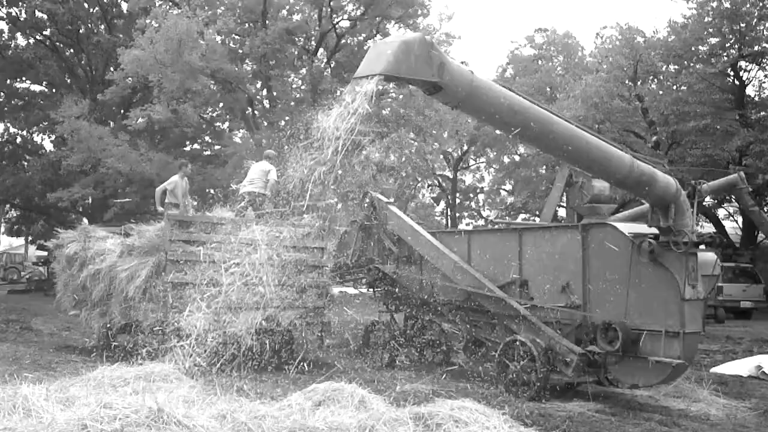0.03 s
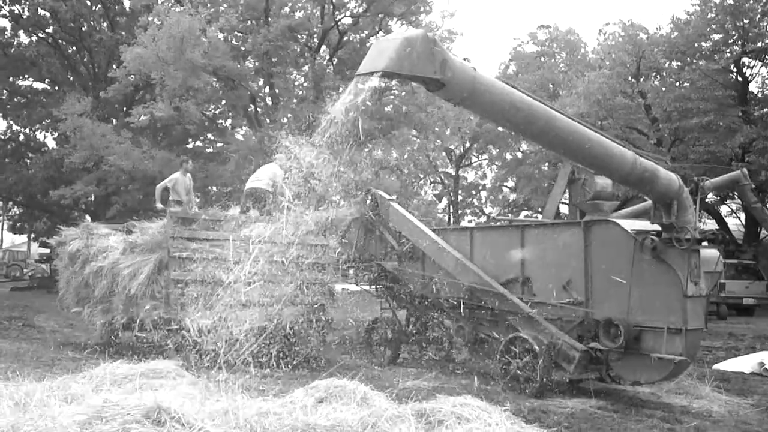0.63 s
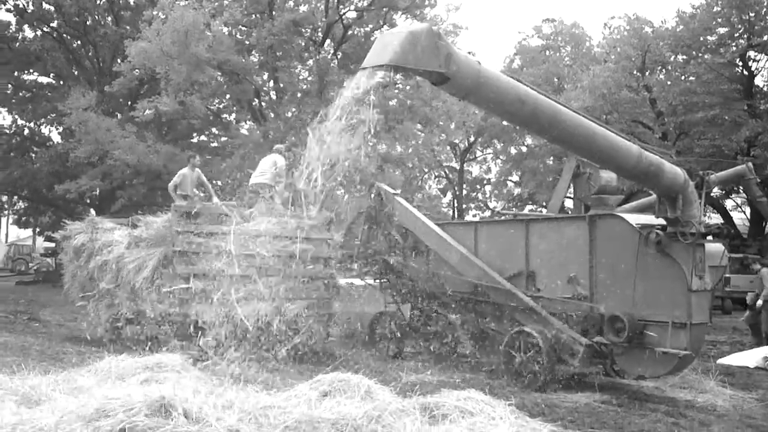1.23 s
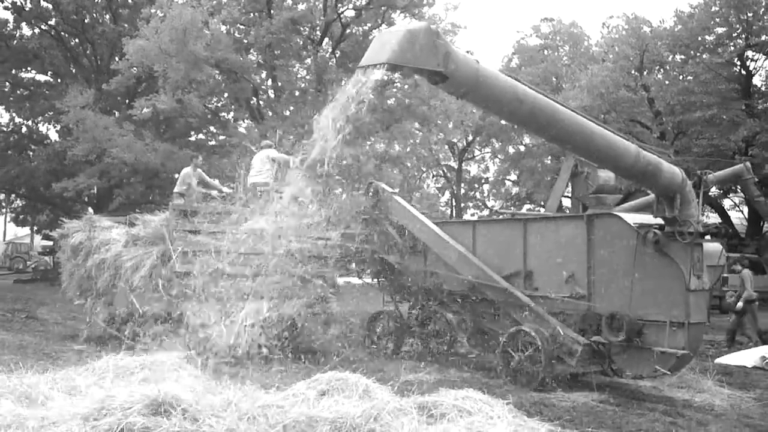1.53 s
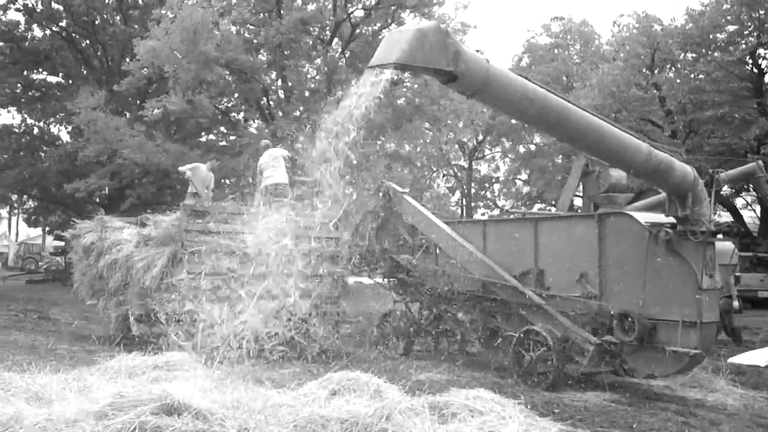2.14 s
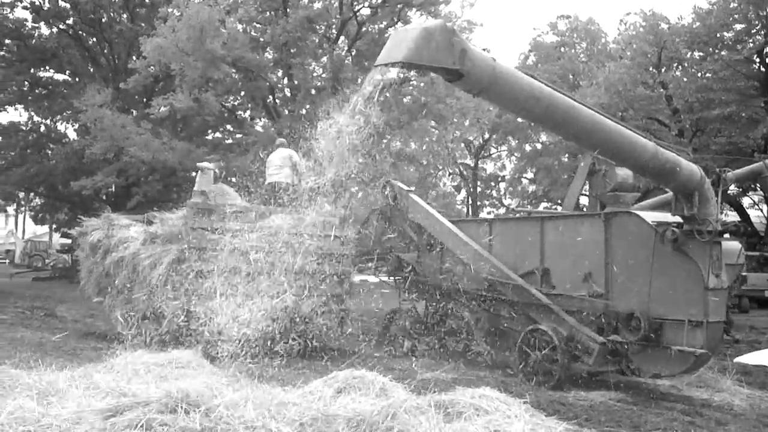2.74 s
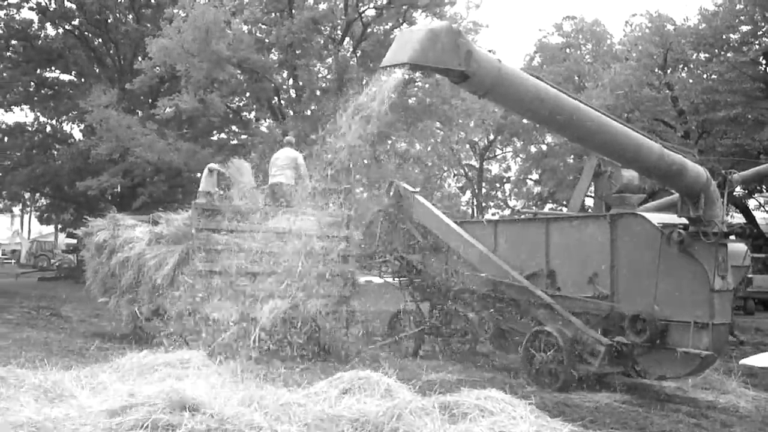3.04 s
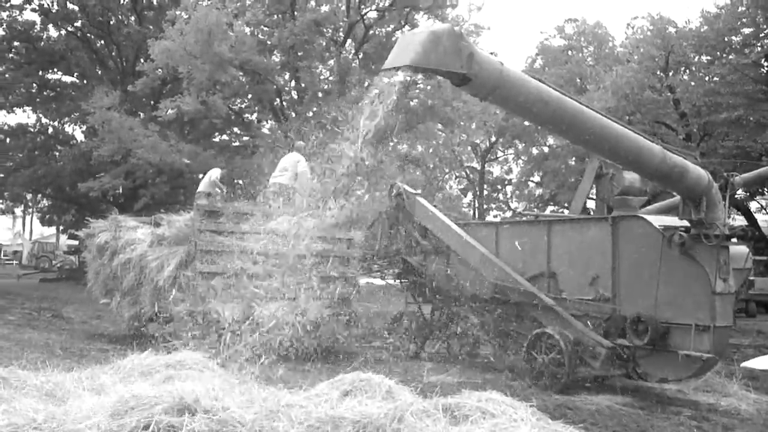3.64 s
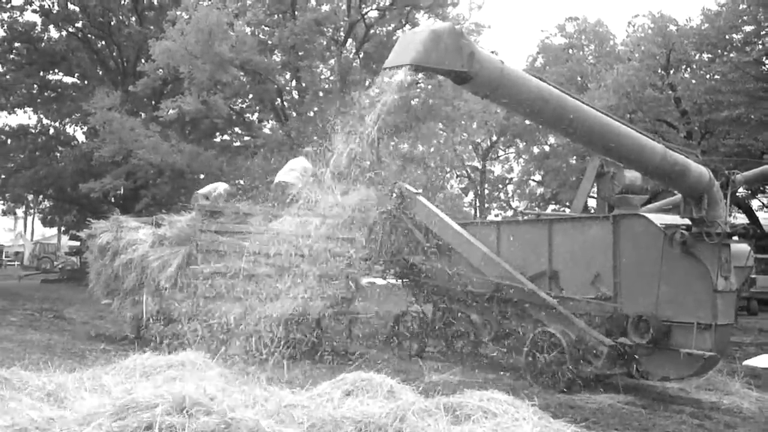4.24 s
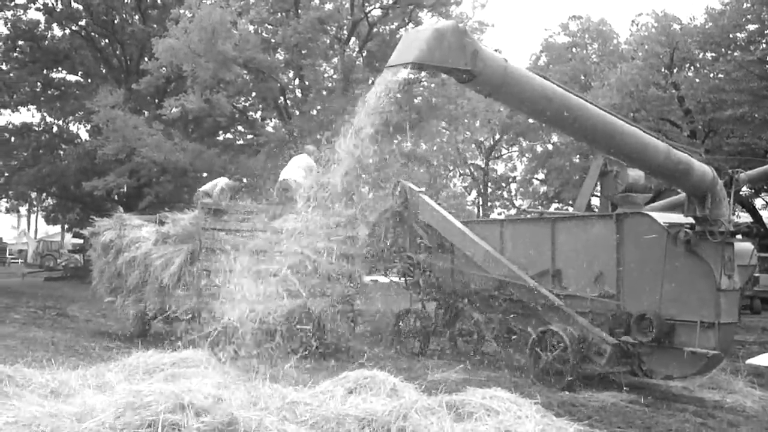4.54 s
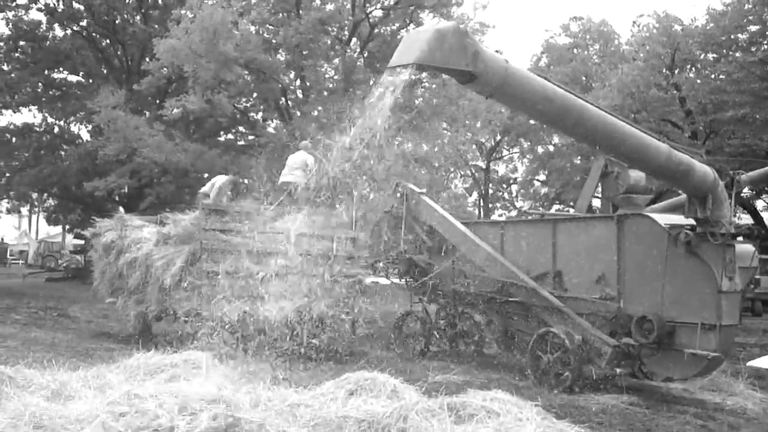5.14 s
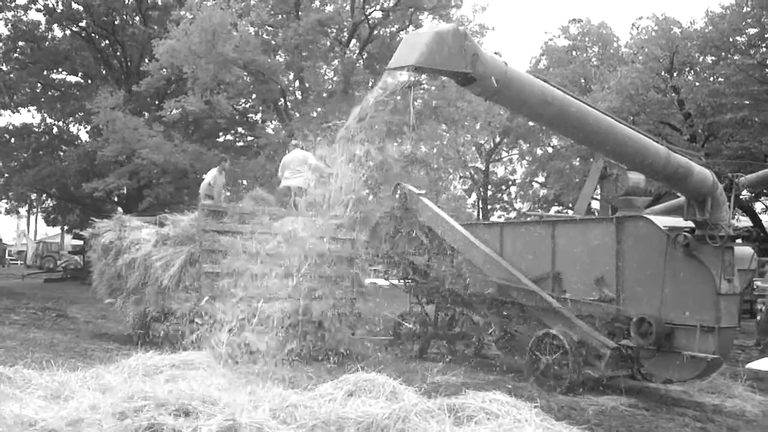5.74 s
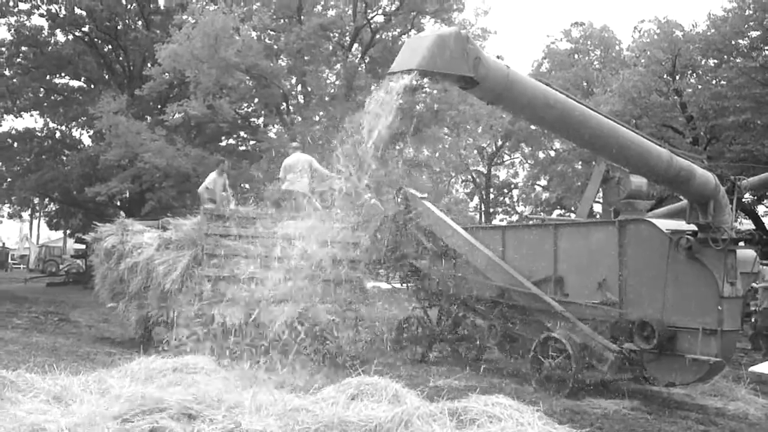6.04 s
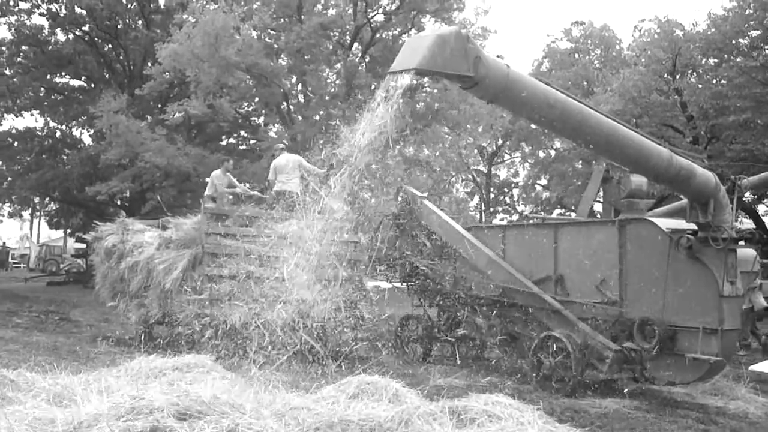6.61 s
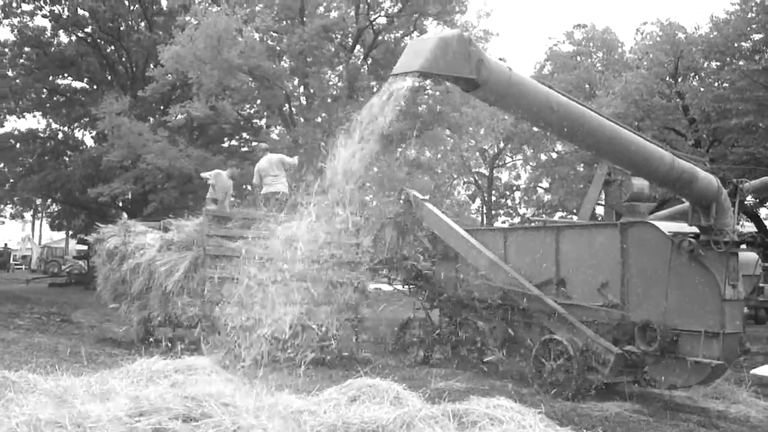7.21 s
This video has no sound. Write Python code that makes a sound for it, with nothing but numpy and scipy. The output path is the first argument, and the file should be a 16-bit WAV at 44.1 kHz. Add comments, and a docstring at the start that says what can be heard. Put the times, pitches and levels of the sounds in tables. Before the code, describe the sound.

Steady rumble and roar of a thresher blowing out straw, with hiss, rattles and a motor droning past late on.

```python
"""A threshing machine's roar and hiss fade in from silence. Drum bars beat sheaves in a ringing
sheet-metal housing; the blower drives air and straw up its pipe; the works knock over a low rumble.
Behind it puffs the slow two-cylinder tractor that drives it. Late on, another motor drones past,
falling in pitch. Heard through a close microphone pair and a stereo widener."""
import sys
import numpy as np
from scipy import signal
from scipy.fft import rfft, irfft, next_fast_len
from scipy.io import wavfile

SR = 44100
rng = np.random.default_rng(int(sys.argv[2]) if len(sys.argv) > 2 else 0)


def inscribe(sig):
    """Save sig as 16-bit PCM at rate SR to the path in sys.argv[1].

    A 1-D sig is mono; a 2-D sig holds one channel per row.
    Samples are clipped to [-1, 1] before scaling.
    """
    pcm = np.round(np.clip(np.atleast_2d(sig).T, -1, 1) * 32767)
    wavfile.write(sys.argv[1], SR, pcm.astype(np.int16))


N = 325017
TIME_S = np.arange(N) / SR
FFT_SIZE = next_fast_len(N + 8192)
BINS_HZ = np.maximum(np.arange(FFT_SIZE // 2 + 1) * SR / FFT_SIZE, 1)

# Table levels are relative; the sources add their own gains.
# Level curves: t/s, level/dB
MOTOR_HUM = [(3.8, -45), (4.5, -32.5), (5.0, -26.5), (5.4, -23.5), (5.66, -28), (5.88, -48), (6.3, -37),
             (6.8, -32), (7.37, -32)]   # passing motor, 3rd harmonic
TRACTOR_LOAD = [(0.9, -28), (1.3, -28), (1.7, -40), (2.4, -34), (3.7, -24), (4.1, -26), (4.7, -24),
                (5.6, -27), (7.37, -25)]   # puff strength
RUMBLE_LEVEL = [(1.0, -33), (2.0, -31.5), (2.7, -30.5), (3.3, -31), (4.0, -30.5), (5.0, -33), (6.0, -32),
                (7.37, -30)]
# Thresher workload: t/s, drum/dB, blower/dB, straw/dB
WORKLOAD = [(1, -31.5, -30, -32), (1.3, -25, -28.5, -29.5), (1.7, -28, -28, -30),
            (2.2, -25.5, -27.5, -28.5), (2.5, -29, -29, -30), (2.8, -27, -26.5, -29.5),
            (3.25, -25.5, -27.5, -28.5), (3.8, -27, -27.5, -29.5), (4.3, -27.5, -26.5, -29),
            (5, -27.5, -26.0, -30), (5.4, -26.5, -26.0, -29.5), (5.9, -27.5, -24.5, -29),
            (6.3, -27.5, -26, -29), (7.37, -28.5, -26.0, -29)]
# Passing motor, one row per multiple: level/dB, decay after the loudest moment/(dB/s)
MOTOR_HARMONICS = [(-31, 16), (-35, 1.5), (-37, 2.3), (-47, 4.9)]
MOTOR_MULTIPLES = (2, 4, 5, 6)
# Blade harmonics favoured by the blower casing: multiple, level/dB
BLADE_HARMONICS = [(9, -47), (10, -41.5), (11, -46), (13, -50)]
# Blows: t/s, peak/dB
HARD_FIRINGS = [(2.335, -30), (2.668, -33), (3.7, -24), (3.98, -39), (4.398, -26), (5.0, -36), (5.672, -32)]
WAD_HITS = [(1.052, -21), (1.209, -17), (1.279, -21), (1.553, -16), (1.585, -18), (1.759, -17.5),
            (1.86, -19), (2.032, -18.5), (2.17, -27), (2.251, -22), (2.279, -20), (2.695, -20),
            (2.818, -17), (3.022, -19), (3.176, -18), (3.575, -32), (3.666, -22), (4.013, -19), (4.27, -21),
            (4.622, -18), (4.694, -22), (4.753, -19), (5.486, -18), (5.783, -16.5), (6.02, -18.5),
            (6.093, -22), (6.171, -17), (6.493, -20), (6.736, -18.5), (6.785, -20), (6.832, -16),
            (7.2, -18), (7.297, -15.5)]   # straw on the hood
SHEAF_HITS = [(1.24, -15.5), (1.322, -17), (1.63, -17), (2.793, -14), (3.028, -15), (3.248, -22),
              (3.473, -17), (3.69, -16), (3.845, -18.5), (4.11, -21), (4.245, -16.5), (4.41, -17.5),
              (4.63, -27), (4.855, -17.5), (5.03, -20.5), (5.255, -21), (5.342, -11.5), (5.52, -19),
              (5.968, -14.5), (6.56, -24), (7.1, -19)]   # sheaves on the drum
# Knocks in the works: t/s, thud peak/dB, pipe ring peak/dB
KNOCKS = [(1.208, -27, -33), (1.282, -18.5, -45), (1.323, -27, -37), (1.758, -25, -32), (3.154, -28, -33),
          (3.241, -28, -28.5), (3.318, -32, -35), (3.475, -26, -33.5), (4.653, -26, -32.5),
          (4.844, -28, -38), (5.512, -24, -41), (5.535, -23, -40)]
# Peaks of the rough low hum: f/Hz, width/Hz, level/dB
LOW_HUM_PEAKS = [(99.4, 13, -5.5), (146, 50, -2), (197.4, 33, -3.5), (239.6, 27, -3), (285, 18, -6)]
# Resonances: f/Hz, width/Hz, level/dB
EXHAUST_MODES = [(111, 35, -1), (138, 56, -3.5)]
PIPE_MODES = [(843, 95, 1.5), (1013, 137, -3.5), (1087, 132, -4.5), (1422, 64, -6)]
HOUSING_MODES = [(409, 48, -6), (514.4, 55, -3), (576, 70, -5.5), (682, 81, -13.5)]
# Noise spectra: f/Hz, density/dB
RUMBLE_SPECTRUM = [(20, -15), (40, -12), (65, -13), (85, -5), (110, -2.5), (170, -0.5), (260, -2),
                   (340, -3.5), (600, -8.5), (900, -31)]
KNOCK_SPECTRUM = [(150, -20), (500, -11), (1100, -1.5), (2000, 2), (5000, -3.5), (12000, -58)]
STRAW_SPECTRUM = [(1200, -32), (2250, 2), (2560, -1), (3050, 1.5), (3600, 2), (4150, 3.5), (4650, 1),
                  (5100, 0.5), (5500, -4.5), (5950, 2.5), (6600, -0.5), (7100, 2), (7700, 0.5),
                  (8400, -0.5), (10000, -6.5), (11000, -13.5), (12700, -7), (14000, -29), (15600, -22)]
AIR_SPECTRUM = [(400, -16.5), (680, -3), (770, -1.5), (850, -0.5), (950, 1.6), (1300, -4), (1800, -3.5),
                (2300, -7.5), (3000, -20.5), (6000, -35)]
# Field at the microphones: f/Hz, side minus mid/dB, mid-side coherence/0-1, side phase/rad
STEREO_FIELD = [(40, -10.5, .1, -1), (62, -9, .2, 3), (82.4, -0.5, 0.26, 1.5), (100, -8.5, 0.85, 2),
                (150, -10.5, 0.97, 2), (226, -13, 0.88, 2), (322, -6.5, 0.93, 1), (414, -6, 0.87, .5),
                (520, -14.5, 0.76, 0.4), (600, -13, .3, 3), (680, -3.5, .65, 3), (764, 2.5, 0.75, .5),
                (880, -7, 0.3, -.5), (1100, -5.5, .3, -1), (1400, 8, 0.5, -4), (1800, 2, 0.48, -4.5),
                (2400, -0.5, 0.24, -4.5), (3420, 1.5, .6, -7.5), (4600, 1, 0.65, -5.5),
                (6100, -1, 0.5, -6.5), (7730, -1, 0.9, -11), (8600, -2.5, 0, -4.5), (10200, 2.5, 1, -10.5),
                (12000, 2.5, 0.3, -6.5), (14000, 1.5, .15, -5)]


def from_db(db):
    """Decibels to gain."""
    return 10 ** (np.asarray(db) / 20)


def unit_rms(x):
    """Scale to rms 1."""
    return x / np.sqrt(np.mean(x ** 2) + 1e-20)


def in_time(rows):
    """Curve columns at every sample."""
    times_s, *columns = np.transpose(rows)
    return [np.interp(TIME_S, times_s, c) for c in columns]


def in_frequency(rows):
    """Spectrum columns at every bin."""
    hz, *columns = np.transpose(rows)
    return [np.interp(np.log(BINS_HZ), np.log(hz), c) for c in columns]


def colour(x, spectrum):
    """Apply a smooth spectrum; rms 1."""
    gain = from_db(in_frequency(spectrum)[0])
    return unit_rms(irfft(rfft(x, FFT_SIZE) * gain, FFT_SIZE)[..., :N])


def resonate(x, modes):
    """Parallel resonators, alternating signs; rms 1."""
    out = 0
    for k, (hz, width_hz, level_db) in enumerate(modes):
        radius = np.exp(-np.pi * width_hz / SR)
        b = np.array([1, 0, -1]) * (1 - radius ** 2) / 2
        a = [1, -2 * radius * np.cos(2 * np.pi * hz / SR), radius ** 2]
        out = out + (-1) ** k * from_db(level_db) * signal.lfilter(b, a, x)
    return unit_rms(out)


def band(x, low_hz, high_hz):
    """Band-pass; rms 1."""
    sos = signal.butter(2, [low_hz, high_hz], "band", fs=SR, output="sos")
    return unit_rms(signal.sosfilt(sos, x))


def flatten(x):
    """Flatten the envelope, keep the pitch; rms 1."""
    phase = np.angle(signal.hilbert(x, FFT_SIZE)[:, :N])
    return unit_rms(np.cos(phase))


def drift(corner_hz):
    """Slow random wander; rms 1."""
    white = rfft(rng.standard_normal(FFT_SIZE))
    slow = white / (1 + (BINS_HZ / corner_hz) ** 2) * (BINS_HZ > 1)
    return unit_rms(irfft(slow, FFT_SIZE)[:N])


def noise():
    """White noise. Rows, as in every source: direct, scattered."""
    return rng.standard_normal((2, N))


def grains(per_s, spread_db):
    """Random impacts of uneven size; rms 1."""
    sizes = from_db(spread_db * np.minimum(rng.exponential(1, N), 4))
    return unit_rms(noise() * sizes * (rng.random(N) < per_s / SR))


def bursts(rows, rise_s, decay_s):
    """Envelope of blows given as t/s, peak/dB."""
    out = np.zeros(N)
    for start_s, peak_db in rows:
        start = int(start_s * SR)
        age_s = TIME_S[:min(SR // 4, N - start)]
        shape = (1 - np.exp(-age_s / rise_s)) ** 2 * np.exp(-age_s / decay_s)
        out[start:start + len(age_s)] += from_db(peak_db) * shape / shape.max()
    return out


def passing_motor(rest_hz=47.75, speed_m_s=28.2, distance_m=28.5, abreast_s=6.08, loudest_s=5.54):
    """Doppler-shifted drone over exhaust rumble; a lengthening echo notches the weak harmonics in turn."""
    sound_m_s, waver = 343, 0.0032
    echo_abreast_s, echo_s_per_s, echo_gain = 0.00993, 0.0024, 0.72
    edge_db, approach_s, deep_swell_s = -6.5, 1.08, 0.88   # swells are at edge_db this far from the peak
    along_m = speed_m_s * (TIME_S - abreast_s)
    receding_m_s = speed_m_s * along_m / np.hypot(along_m, distance_m)
    firing_hz = rest_hz / (1 + receding_m_s / sound_m_s)
    phase = 2 * np.pi * np.cumsum(firing_hz * (1 + waver * drift(4.8))) / SR
    echo_lag_s = echo_abreast_s + echo_s_per_s * (TIME_S - abreast_s)
    echo_phase = phase - 2 * np.pi * firing_hz * echo_lag_s
    before_s, after_s = np.maximum(loudest_s - TIME_S, 0), np.maximum(TIME_S - loudest_s, 0)
    swell_db = edge_db * (before_s / approach_s) ** 2
    gains = [from_db(swell_db + db - db_per_s * after_s) for db, db_per_s in MOTOR_HARMONICS]
    hum_db, = in_time(MOTOR_HUM)
    drone = from_db(hum_db) * np.sin(3 * phase)
    for k, gain in zip(MOTOR_MULTIPLES, gains):
        offset = rng.uniform(0, 2 * np.pi)
        drone += gain * (np.sin(k * phase + offset) + echo_gain * np.sin(k * echo_phase + offset))
    rumble = from_db(-8) * np.linalg.norm(gains, axis=0) * band(noise(), 200, 320)
    deep_db = -41 + edge_db * ((TIME_S - loudest_s) / deep_swell_s) ** 2
    deep_exhaust = from_db(deep_db) * band(noise(), 58, 93)
    return np.array([drone, np.zeros(N)]) + rumble + deep_exhaust


def tractor(first_s=0.877, cycle_s=0.3435, gap_s=0.093, cylinders_db=(-2, -4.5), scatter_db=4.0):
    """Two cylinders fire in quick succession, then rest; puffs follow the load and boom in the exhaust."""
    firings_s = np.arange(first_s, TIME_S[-1] - gap_s, cycle_s)[:, None] + [0, gap_s]
    load_db = np.interp(firings_s, *np.transpose(TRACTOR_LOAD))
    puff_db = load_db + cylinders_db + scatter_db * rng.standard_normal(firings_s.shape)
    puffs = list(zip(firings_s.ravel(), puff_db.ravel())) + HARD_FIRINGS
    exhaust = band(resonate(noise(), EXHAUST_MODES), 102, 173)
    boom = band(flatten(exhaust), 83, 170)
    return boom * bursts(puffs, rise_s=0.016, decay_s=0.0094)


def blades(blade_hz=50.2, belt_waver=0.01, straw_jitter=0.012, throb_db=2.0):
    """Faint, rough blower whirr; pitch wanders with the belt and shakes as straw passes."""
    speed = 1 + belt_waver * drift(3.1) + straw_jitter * drift(27)
    phase = 2 * np.pi * np.cumsum(blade_hz * speed) / SR
    whirr = np.zeros(N)
    for k, level_db in BLADE_HARMONICS:
        gain = from_db(level_db + throb_db * drift(9))
        whirr += gain * np.sin(k * phase + rng.uniform(0, 2 * np.pi))
    return np.array([whirr, np.zeros(N)])


def low_rumble(rumble_db, sway_db=1.0):
    """Low rumble with a rough hum near 100-285 Hz."""
    hum = band(resonate(noise(), LOW_HUM_PEAKS), 87, 280)
    gain = from_db(rumble_db + sway_db * drift(5.6))
    return gain * (colour(noise(), RUMBLE_SPECTRUM) + hum)


def clatter(thud_trim_db=-10.5, wad_trim_db=-15.5, thump_s=3.705, thump_db=-27.0):
    """Knocks ring in the blower pipe, straw wads hit the hood, the frame thumps once."""
    knock_s, thud_db, ring_db = np.transpose(KNOCKS)
    thuds = colour(noise(), KNOCK_SPECTRUM) * bursts(zip(knock_s, thud_db), rise_s=0.003, decay_s=0.013)
    pipe = band(resonate(noise(), PIPE_MODES), 720, 1260)
    rings = pipe * bursts(zip(knock_s, ring_db), rise_s=0.0027, decay_s=0.012)
    rustle = colour(noise() + grains(per_s=4400, spread_db=2.0), STRAW_SPECTRUM)
    wads = rustle * bursts(WAD_HITS, rise_s=0.0031, decay_s=0.0086)
    thump = flatten(band(noise(), 58, 100)) * bursts([(thump_s, thump_db)], rise_s=0.018, decay_s=0.02)
    return from_db(thud_trim_db) * thuds + rings + from_db(wad_trim_db) * wads + thump


def straw(straw_db, trim_db=-7.0, clump_db=1.27, tick_gain=0.21):
    """Chaff hisses from the hood in clumps; single stalks and kernels tick."""
    stream = colour(noise() + tick_gain * grains(per_s=1500, spread_db=2.5), STRAW_SPECTRUM)
    return from_db(straw_db + trim_db + clump_db * drift(21)) * stream


def blower(blower_db, straw_db, rush_trim_db=-9.0, rattle_trim_db=-11.5, flutter_db=0.42):
    """Turbulent air rushes up the pipe; stalks, fed by shaker strokes, rattle on its wall."""
    shaker_hz, stroke_peak_s, stroke_db = 3.03, 0.27, 0.6
    turbulence = noise() + 0.5 * grains(per_s=1500, spread_db=1.5)
    rush = from_db(blower_db + rush_trim_db) * colour(turbulence, AIR_SPECTRUM)
    stalks = grains(per_s=1200, spread_db=2.0)
    rattle = from_db(straw_db + rattle_trim_db) * band(resonate(stalks, PIPE_MODES), 835, 1820)
    strokes = np.cos(2 * np.pi * shaker_hz * (TIME_S - stroke_peak_s))
    return from_db(stroke_db * strokes + flutter_db * drift(6.7)) * (rush + rattle)


def drum(drum_db, roar_trim_db=-6.5, sheaf_trim_db=-12.5):
    """Bars beat the sheaves and ring the housing; thick sheaves make it boom."""
    beating = grains(per_s=2500, spread_db=1.5)
    roar = from_db(drum_db + roar_trim_db) * band(resonate(beating, HOUSING_MODES), 368, 723)
    housing = band(resonate(noise(), HOUSING_MODES), 474, 587)
    boom = band(flatten(housing), 457, 650)
    return roar + from_db(sheaf_trim_db) * boom * bursts(SHEAF_HITS, rise_s=0.01, decay_s=0.012)


def microphones(sound):
    """Mid: direct sound. Side: phase-shifted direct plus scattered sound. Returns left, right."""
    direct, scattered = rfft(sound, FFT_SIZE)
    side_db, coherence, phase_rad = in_frequency(STEREO_FIELD)
    coherent = coherence * np.exp(1j * phase_rad) * direct
    diffuse = np.sqrt(np.maximum(1 - coherence ** 2, 0)) * scattered
    side = from_db(side_db) * (coherent + diffuse)
    return irfft([direct + side, direct - side], FFT_SIZE)[:, :N]


def scene():
    """Thresher, tractor and passing motor at the microphone pair."""
    drum_db, blower_db, straw_db = in_time(WORKLOAD)
    rumble_db, = in_time(RUMBLE_LEVEL)
    thresher = low_rumble(rumble_db) + drum(drum_db) + blower(blower_db, straw_db)
    thresher += blades() + straw(straw_db) + clatter()
    return microphones(thresher + tractor() + passing_motor())


def record(dry):
    """Widen by subtracting the delayed opposite channel; fade in; low-pass."""
    lag_s, fade_span_s, cutoff_hz = 0.000361, (0.71, 1), 15750
    delay = np.exp(-2j * np.pi * BINS_HZ * lag_s)
    opposite = irfft(rfft(dry[::-1], FFT_SIZE) * delay, FFT_SIZE)[:, :N]
    faded = (dry - opposite) * np.interp(TIME_S, fade_span_s, [0, 1])
    return signal.sosfilt(signal.ellip(12, .1, 80, cutoff_hz, fs=SR, output="sos"), faded)


dry = scene()
out = record(dry)
inscribe(out)
```